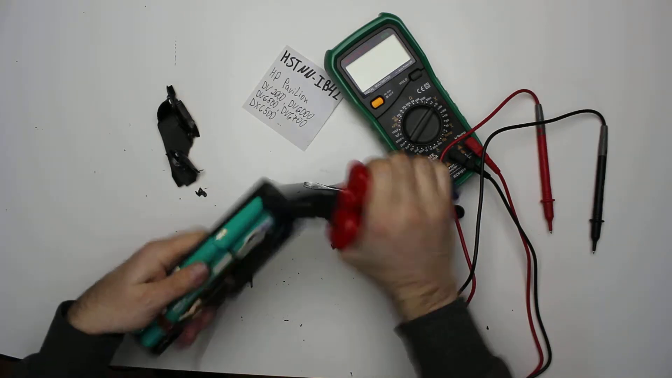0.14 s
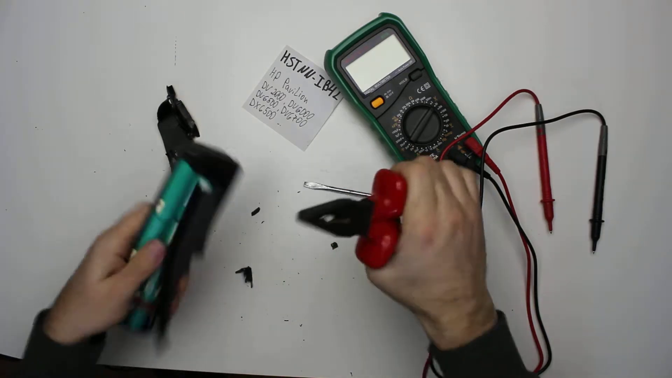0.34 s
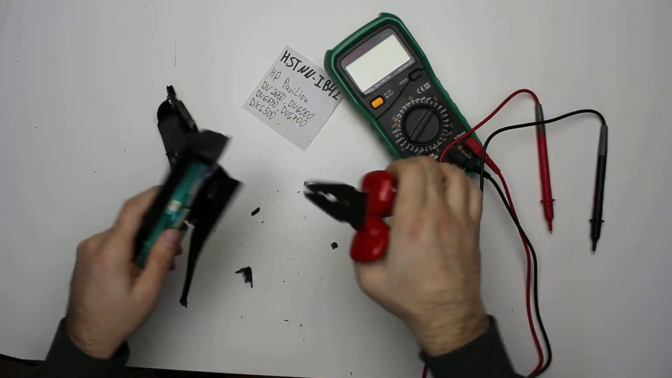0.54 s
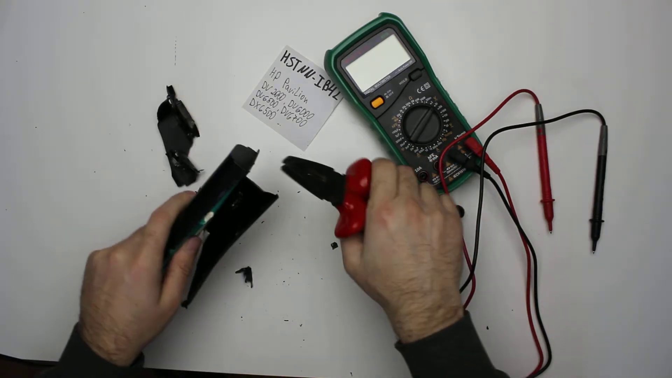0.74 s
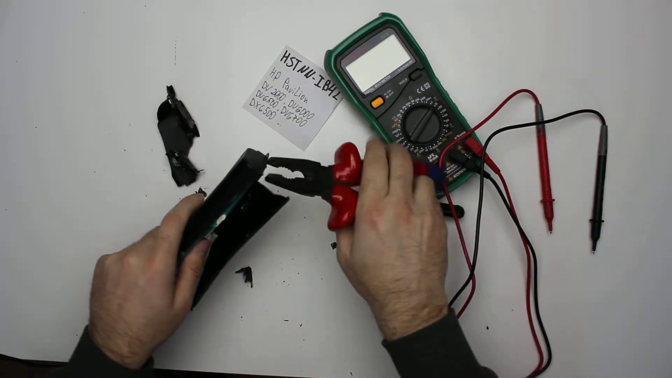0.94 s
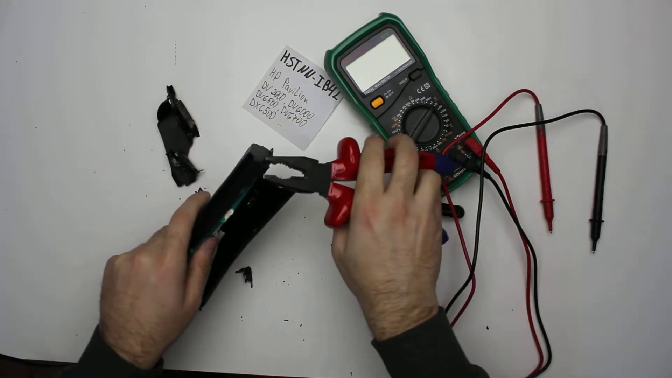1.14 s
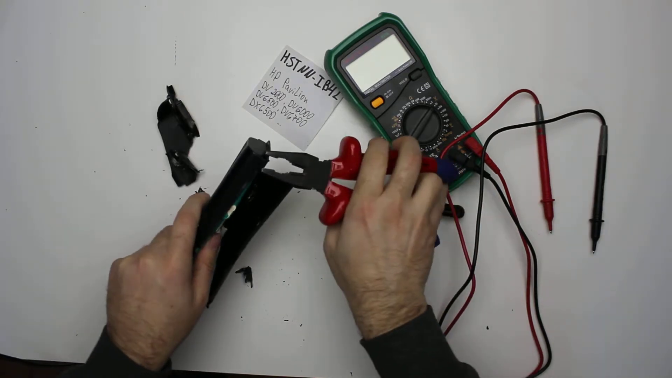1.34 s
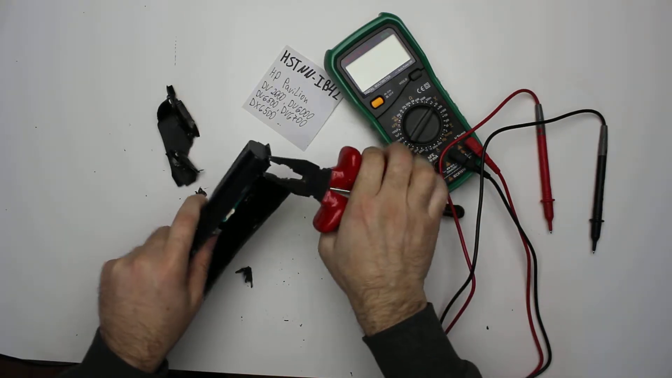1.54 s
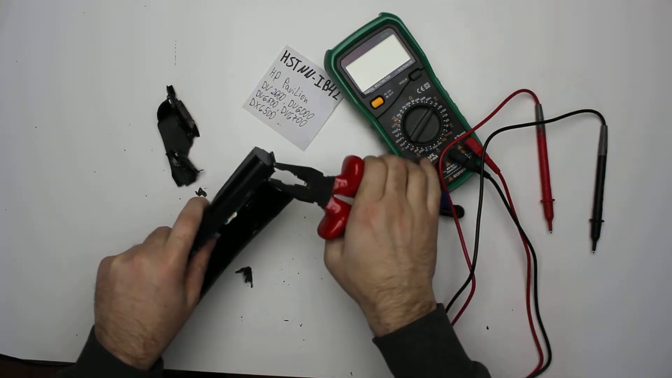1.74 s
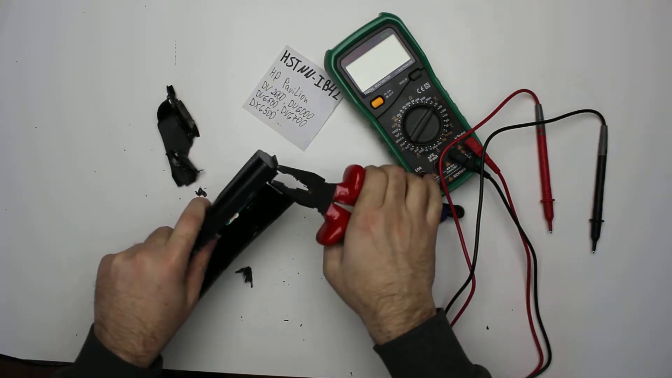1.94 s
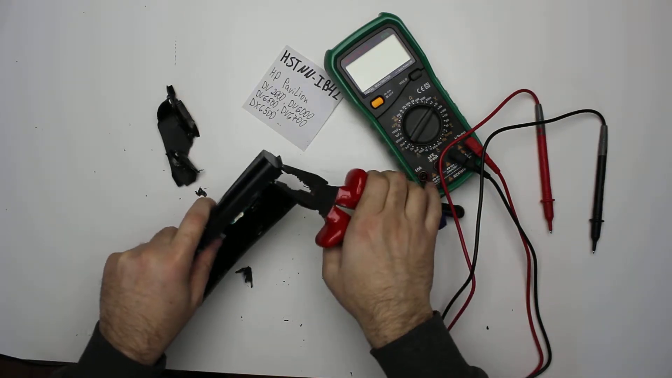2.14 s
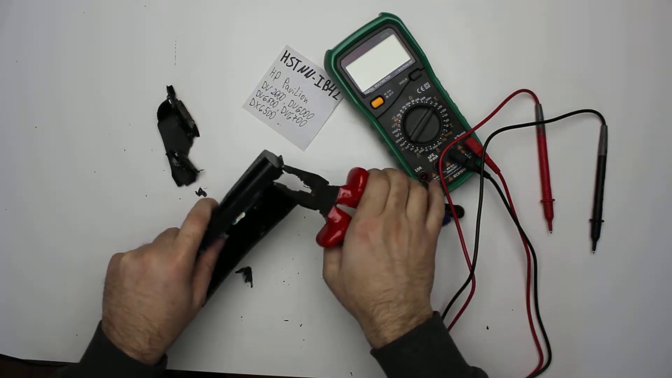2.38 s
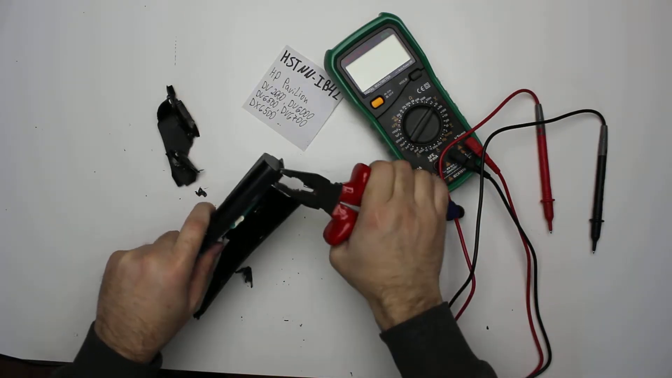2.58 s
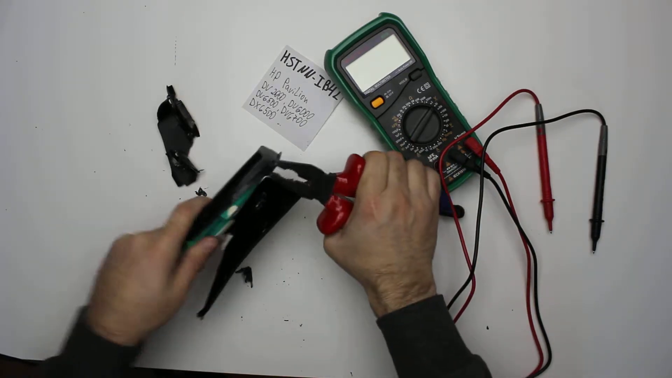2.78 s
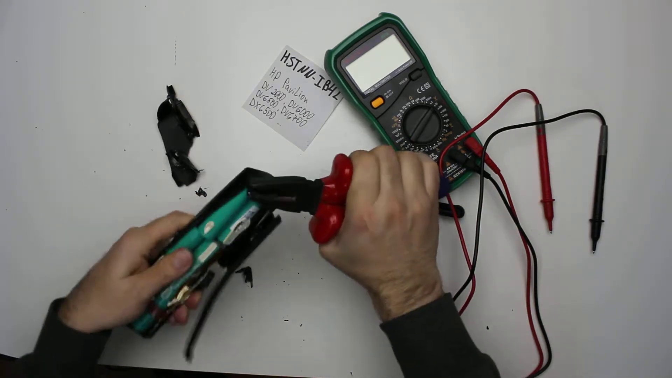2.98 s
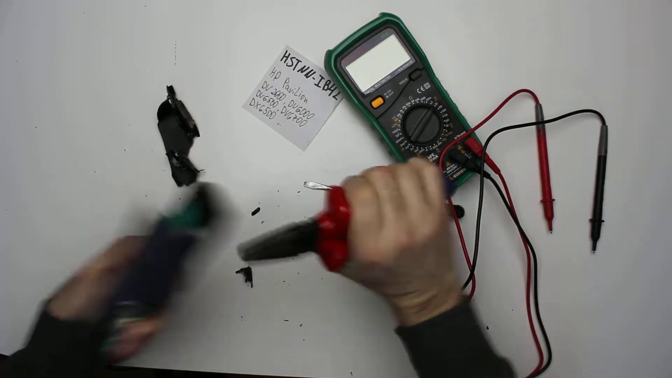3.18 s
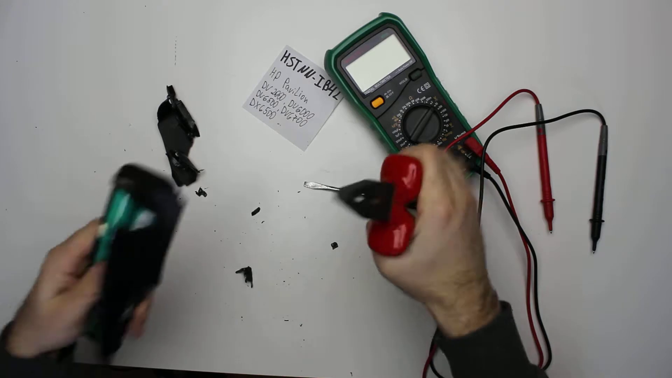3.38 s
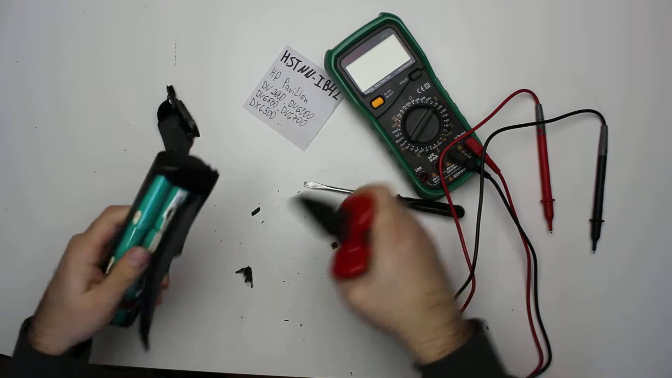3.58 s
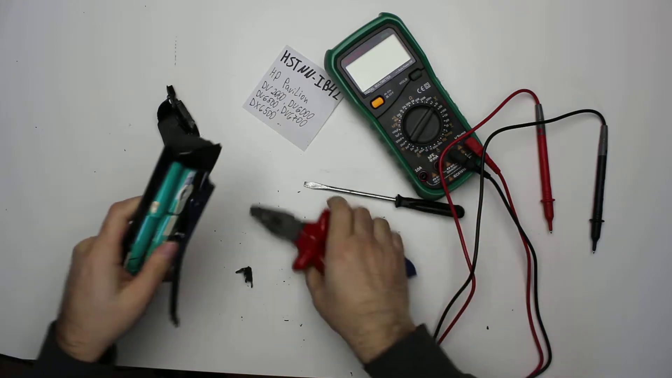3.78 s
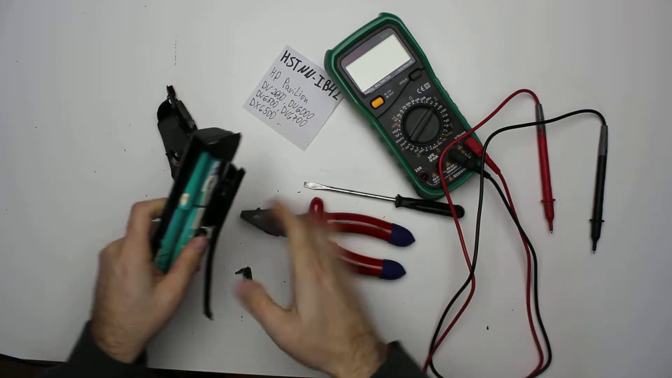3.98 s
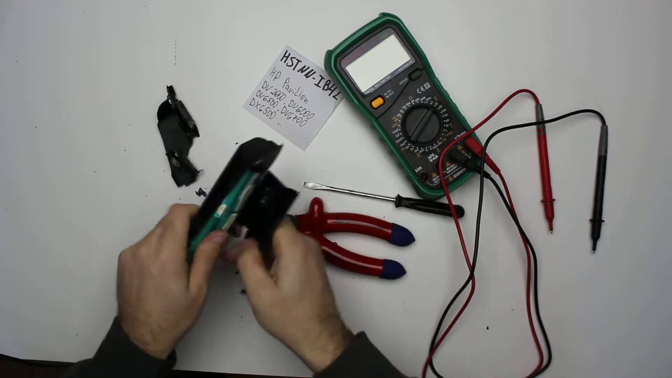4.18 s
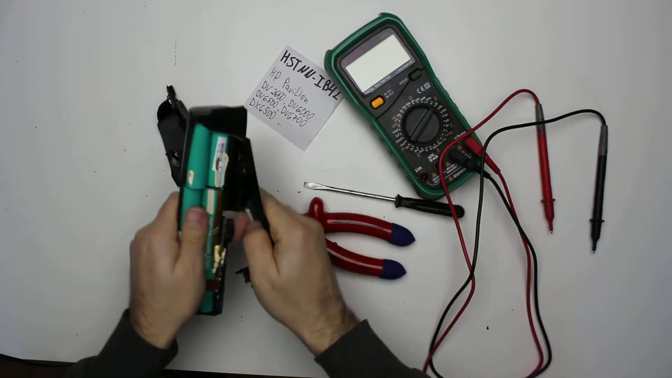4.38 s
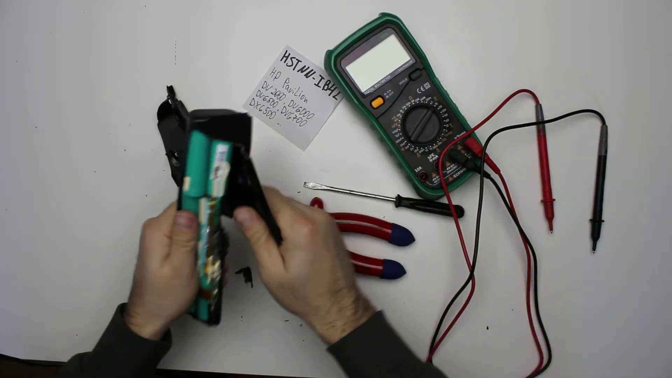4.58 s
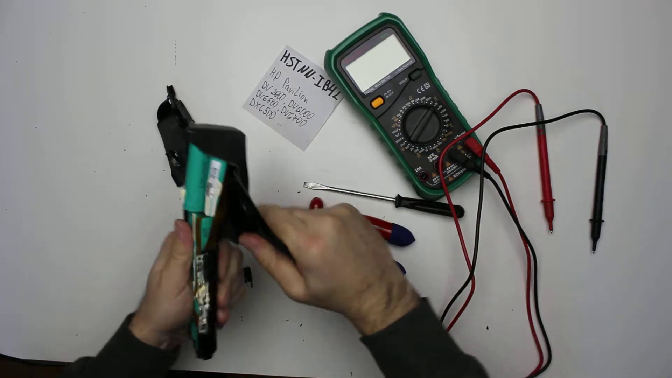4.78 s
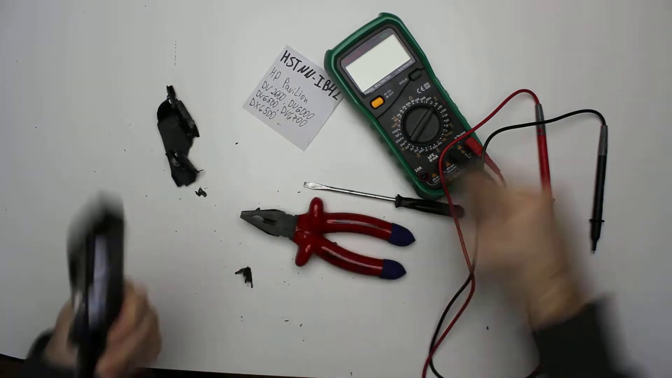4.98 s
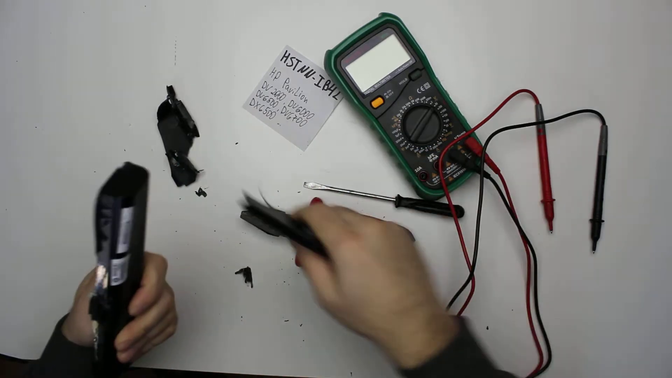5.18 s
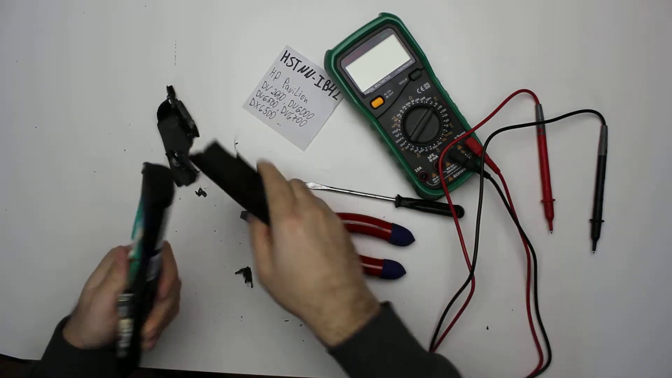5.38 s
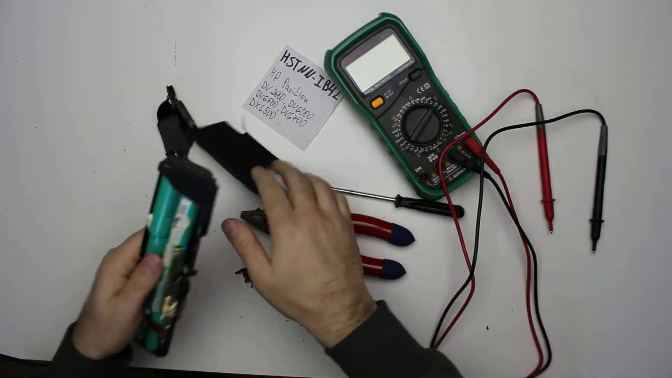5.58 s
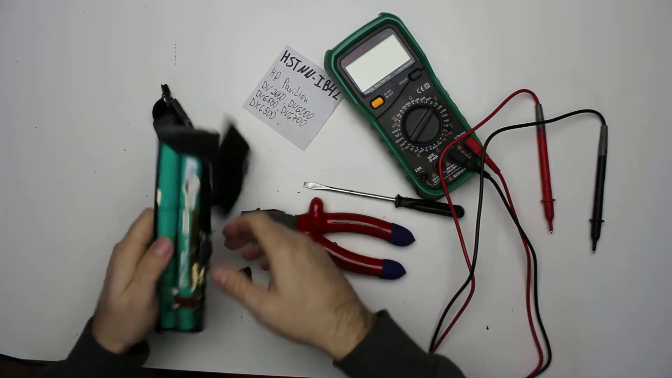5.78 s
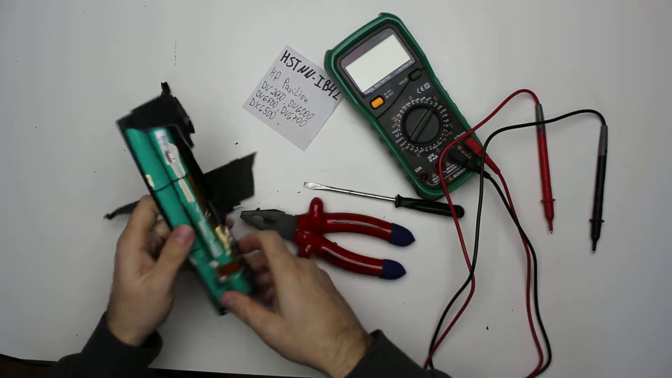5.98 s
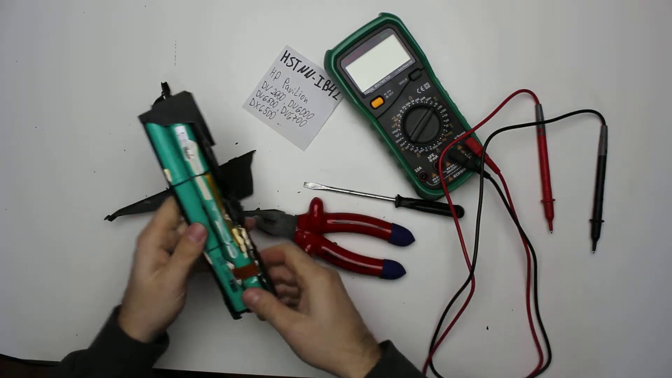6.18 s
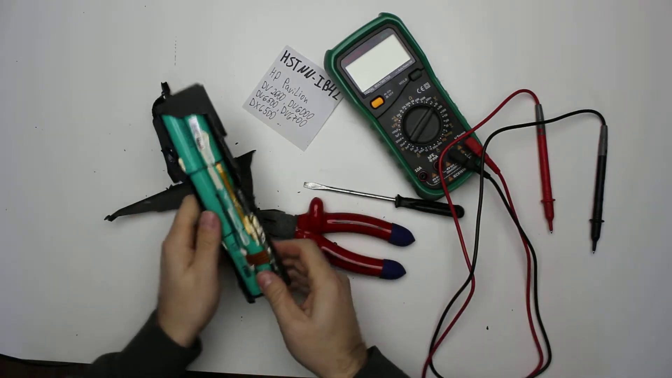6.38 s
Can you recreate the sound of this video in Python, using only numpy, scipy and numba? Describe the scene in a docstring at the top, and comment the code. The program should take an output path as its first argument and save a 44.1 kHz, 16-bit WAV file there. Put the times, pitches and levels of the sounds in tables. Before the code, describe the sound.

A short scrape and a sharp plastic snap open the sound, as pliers pry at a hard battery case. Sparse small ticks follow until about 1.5 seconds, then a pause. From 2.4 seconds, clicks and little creaks gather, with loud cracks at 2.9 and 3.1 seconds. At 3.8 seconds the pliers drop onto a table with a heavy thud and bounce a few times. The plastic crackles, scrapes and ticks from 4.1 seconds, breaking with a loud, bright cluster of snaps at 4.8. After a few faint ticks, the torn-off lid clatters down at 5.5 seconds, and dense knocks and rubbing continue until 6, thinning to light ticks by 6.5. Everything sounds close, in a small room with a short echo, faint hiss and low room noise. The hardest hits distort slightly and briefly duck the volume.

```python
"""In a small room, a hard plastic battery case is pried with pliers over a table. It scrapes, snaps,
ticks and creaks as its cells, wall and breaking edge are set ringing. The pliers drop on the table top
and bounce, and the torn-off lid clatters down after them. Quiet hiss and low room noise lie beneath.
The loudest blows are clipped, and an automatic volume control dips fast and slowly rises again."""
import sys
import numpy as np
from scipy import signal
from scipy.fft import rfft, irfft, next_fast_len
from scipy.io import wavfile
from scipy.ndimage import uniform_filter1d
from numba import njit

SR = 44100
rng = np.random.default_rng(int(sys.argv[2]) if len(sys.argv) > 2 else 0)


def unload_audio(sound):
    """Save the sound as a 16-bit wav file, at the path given as the first command line argument."""
    columns = np.transpose(np.atleast_2d(sound))
    # keep every value between -1 and 1, then stretch to whole-number steps
    steps = np.round(np.clip(columns, -1, 1) * 32767)
    wavfile.write(sys.argv[1], SR, steps.astype(np.int16))


N = 283561


def amp(db):
    """Turns decibels into a multiplier."""
    return 10 ** (np.asarray(db) / 20)


def unit(x):
    """Scales a sound to an average power of 1."""
    return x / np.sqrt(np.mean(x ** 2) + 1e-20)


def along(points, hz):
    """Reads between (pitch_hz, value) points on a log pitch scale."""
    pitches, values = np.transpose(points)
    return np.interp(np.log(hz + 1), np.log(pitches + 1), values)


def filtered(x, response):
    """Multiplies each frequency in x by response(hz)."""
    size = next_fast_len(len(x) + 8192)
    return irfft(rfft(x, size) * response(np.fft.rfftfreq(size, 1 / SR)), size)[:len(x)]


def resonances(modes, hz):
    """How strongly each mode (a pitch an object likes to ring at) answers, one row a mode."""
    return np.array([(-1) ** k * amp(db) * 1j * hz * width / (pitch ** 2 - hz ** 2 + 1j * hz * width)
                     for k, (pitch, width, db) in enumerate(modes)])


def ringing(x, modes):
    """The sound of an object with these modes when x shakes it."""
    return filtered(x, lambda hz: resonances(modes, hz).sum(axis=0))


# How long the room's main echo takes to fade by 60 dB: pitch_hz, fade_s
ROOM_FADES = [(200, 0.16), (600, 0.19), (2500, 0.32), (5000, 0.28), (10000, 0.18), (16000, 0.12)]

def room_tail():
    """A fresh room echo of energy 1, each pitch dying away at its own speed."""
    hz, t, noise = signal.stft(rng.standard_normal(SR * 2 // 3), SR, nperseg=256)
    fall_db = -60 * t / along(ROOM_FADES, hz)[:, None]
    lingering = amp(-21.5 + fall_db / 3.4)
    tail = signal.istft(noise * (amp(fall_db) + lingering), SR, nperseg=256)[1]
    return np.pad(tail / np.linalg.norm(tail), (round(0.0036 * SR), 0))  # delay from the nearest wall


# The tone colour of the room's hiss: pitch_hz, relative_level_db
HISS_COLOUR = [(15, -73), (25, -34.5), (120, -19.5), (150, -12), (195, -10.5), (320, -16), (580, -21.5),
               (720, -19), (1100, -24.5), (2080, -28.5), (5970, -35), (8300, -35.5), (15600, -42.5),
               (16000, -79.5)]

def hiss():
    """Quiet, steady room noise, strongest in the bass."""
    return amp(-52.5) * unit(filtered(rng.standard_normal(N), lambda hz: amp(along(HISS_COLOUR, hz))))


# The random flutter of the low room noise, drawn as a level curve: time_s, level_db
FLUTTER_LEVELS = [(0, -71), (0.421, -51), (0.681, -59.5), (0.959, -49), (1.22, -64.5), (1.6, -60),
                  (1.92, -49.5), (2.14, -57), (2.299, -51.5), (2.539, -62.5), (2.85, -55.5), (3.348, -58),
                  (3.7, -48), (4.2, -59), (4.549, -47), (4.799, -57.5), (6.05, -57.5), (6.269, -47)]

def low_room_noise():
    """A steady, narrow band of room noise near 163 Hz, played as a sine that follows the flutter."""
    level_db = np.interp(np.arange(N) / SR, *np.transpose(FLUTTER_LEVELS))
    pitch_hz = 163.8 + 0.44 * (level_db + 54.5)
    return np.sqrt(2) * amp(level_db) * np.sin(2 * np.pi * np.cumsum(pitch_hz) / SR)


# How the pack of cells, the case wall and the breaking edge ring: pitch_hz, width_hz, relative_level_db
CELL_MODES = [(306, 77, 2.5), (433, 22, 1), (546.3, 49, 0.5), (742, 80, 1), (1027, 118, -2.5),
              (1229, 100, 1.5), (1483, 277, -2.5)]
WALL_MODES = [(1826, 540, -8), (2220, 258, 0), (2532, 140, 1.5), (2970, 455, -3.5), (3778, 610, -5.5),
              (4426, 330, -2), (4752, 285, -1.5), (6570, 1400, -11.5)]
EDGE_MODES = [(5900, 630, -12.5), (9540, 3200, 0), (11440, 850, 4), (14660, 4600, 0), (15980, 1000, 0.5)]
# Strokes of fingers and plier jaws over the case:
# start_s, length_s, start_db, end_db, edge_above_wall_db, cells_above_wall_db
STROKES = [(0, .12, -22.5, -81, -13, -3), (2.441, 0.097, -43, -49, -2, -2), (2.523, 0.33, -53, -61, -5, 7),
           (2.876, 0.0046, -37, -28, -1, -2), (3.074, 0.07, -33, -58, -11, -14),
           (3.776, 0.045, -46, -45.5, -1, 16), (3.95, .125, -59, -52, 5, -3),
           (4.085, 0.029, -32, -31, 2.5, -20), (4.15, 0.076, -25, -64, -1.5, -15),
           (4.282, 0.06, -47.5, -45, 1.5, 1), (4.455, 0.082, -38.5, -43, 0, 1),
           (4.57, .18, -53, -59, 0, -2.5), (5.197, .3, -60.5, -61, 2, 9.5),
           (5.54, .15, -28.5, -37.5, -11, 8), (5.697, 0.082, -19.5, -42, -6, 5.5),
           (5.786, 0.038, -38, -38, 5, 18), (5.864, 0.16, -39.5, -53.5, -4, 18),
           (6.043, 0.2, -63.5, -57, 3.5, 12.5), (6.27, 0.24, -52, -55, 0.5, -2)]

def rubbing():
    """Many tiny slips of uneven size shake the three parts of the case."""
    out = np.zeros(N)
    slips = rng.standard_normal(N) * amp(3 * rng.exponential(size=N))
    table_echo_s, table_echo_db = .00045, -10.5
    slips = filtered(slips, lambda hz: 1 + amp(table_echo_db) * np.exp(-2j * np.pi * hz * table_echo_s))
    wall, edge, cells = (unit(ringing(slips, modes)) for modes in (WALL_MODES, EDGE_MODES, CELL_MODES))
    for start_s, length_s, start_db, end_db, edge_db, cells_db in STROKES:
        blend = wall + amp(edge_db) * edge + amp(cells_db) * cells
        stroke = blend[round(start_s * SR):][:round(length_s * SR)]
        add(out, start_s, stroke * amp(np.linspace(start_db, end_db, len(stroke))))
    return out + amp(-5.5) * signal.fftconvolve(out, room_tail())[:N]


# Snaps, ticks and clatter of the plastic (each part stretches the base fade by its own amount):
# start_s, wall_db, cells_db, edge_db, base_fade_s, wall_pitch_hz, cells_pitch_hz
SNAP_EVENTS = [(.1371, 2, -9, 10.5, 0.033, 4030, 782), (.175, -17, -18.5, -13, 0.017, 4670, 810),
               (.4505, -25, -60, -2, .0056, 2670, 730), (.5027, -41, -54, -32.5, .028, 2760, 540),
               (.5349, -60, -55, -39, 0.033, 4040, 740), (1.0467, -17.5, -29, -21.5, 0.04, 3740, 1250),
               (1.1414, -39, -43, -39.5, 0.015, 2420, 1380), (1.1886, -39.5, -44, -42, .019, 2720, 433),
               (1.3434, -45, -66, -28.5, 0.02, 2780, 830), (1.4678, -30.5, -40.5, -20, 0.014, 4060, 1410),
               (1.4988, -42.5, -40.5, -45, 0.028, 4100, 597), (2.4374, -25, -31.5, -29, 0.029, 4110, 573),
               (2.5154, -16, -27, -20, 0.022, 2350, 1170), (2.5471, -26.5, -35, -36, .013, 2320, 1230),
               (2.5711, -27.5, -53, -16.5, 0.018, 4180, 980),
               (2.6057, -22.5, -31, -26.5, 0.0056, 2180, 1160),
               (2.6332, -40, -39.5, -35.5, 0.017, 2270, 1290), (2.6997, -29, -32.5, -7, 0.018, 2130, 375),
               (2.7056, -11.5, -25.5, -17.5, 0.0036, 5060, 566), (2.7303, -23, -44, -8, 0.009, 5400, 362),
               (2.8131, -19, -37.5, -22.5, 0.0087, 4670, 1390),
               (2.8226, -15, -26, -19.5, 0.003, 1960, 1410),
               (2.8343, -23.5, -33.5, -1.5, 0.0068, 1980, 690), (2.8471, -26, -31, -14, 0.021, 4700, 464),
               (2.8856, 5, -13.5, 12.5, 0.018, 4230, 600), (2.9917, -20, -41, -16, 0.0027, 3950, 766),
               (3.0751, -25, -27.5, -25.5, 0.004, 2010, 750),
               (3.0935, -20.5, -29.5, -15.5, .0046, 1970, 490), (3.1085, -17.5, -23, -21, 0.013, 1980, 710),
               (3.138, 8, -3.5, 16.5, 0.0055, 4100, 577), (3.1479, 0, -4, 7, 0.02, 1850, 1400),
               (3.1875, -31, -50, -5, .0097, 4080, 1400), (3.3273, -30.5, -48, -21, 0.0091, 4780, 1380),
               (3.3488, -33, -38, -16, 0.003, 4870, 1290), (3.3751, -39, -55, -29, 0.005, 4770, 750),
               (3.5161, -20, -51.5, -1, 0.0059, 4180, 562), (3.6534, -51.5, -43.5, -30, 0.012, 1830, 370),
               (3.779, -18.5, -19.5, -56, 0.037, 1990, 360), (3.8227, 1.5, 14, -2.5, .032, 1560, 331),
               (3.8921, -12, -19.5, -16.5, 0.02, 2030, 358), (3.9573, 3, 8, -33.5, 0.008, 1800, 713),
               (4.0871, -42, -33, -34, 0.042, 2210, 640), (4.1311, -24, -42, -29, .018, 4020, 680),
               (4.1494, -17.5, -20, -15, 0.023, 2430, 730), (4.1925, -13.5, -34, -9, 0.01, 4150, 770),
               (4.2724, -30.5, -39, -15, 0.013, 1600, 1395), (4.3432, -18.5, -19, -13, 0.022, 4300, 704),
               (4.3488, -12.5, -38, -18, 0.016, 4250, 720), (4.3618, -28, -41.5, 8, 0.018, 4640, 940),
               (4.3653, -26, -39, 4.5, 0.0031, 4210, 765), (4.3904, -22, -30.5, -1, 0.0055, 4880, 1150),
               (4.4031, -19, -26, -2, 0.0049, 4250, 1460), (4.4249, -19, -38.5, -30.5, 0.0073, 2870, 1320),
               (4.4291, -33.5, -54, -7.5, 0.0057, 3800, 1200),
               (4.4861, -11.5, -29.5, -12.5, 0.0093, 3750, 730),
               (4.5446, -14, -17, -18.5, 0.0054, 2600, 1290), (4.5484, -1, -7, -9, 0.0054, 2570, 694),
               (4.602, -20, -26, -22, .004, 4200, 1390), (4.6343, -19.5, -32, -24.5, 0.0055, 2140, 1130),
               (4.651, -45.5, -48.5, -33, .004, 4790, 1400),
               (4.6656, -15.5, -22.5, -25.5, 0.0083, 1860, 740), (4.688, -40.5, -52, -31, .004, 4800, 1400),
               (4.7046, -18.5, -28, -19.5, 0.012, 1740, 1390), (4.717, -24.5, -51, -25.5, .004, 4820, 1400),
               (4.7589, -6, -19.5, .5, 0.0065, 2400, 695), (4.7861, -23, -24.5, -31.5, 0.012, 1780, 744),
               (4.8183, 10, -1, 22.5, 0.012, 5050, 762), (4.8274, 10, -7.5, 11.5, 0.0075, 2740, 1340),
               (4.8416, 7, -17.5, 15.5, 0.016, 2850, 573), (5.2561, -29, -53, -29, 0.012, 5690, 678),
               (5.3522, -31.5, -59.5, -32.5, 0.011, 4840, 950), (5.3724, -32, -39, -27, 0.027, 2660, 360),
               (5.428, -35, -45, -28, .0062, 4290, 1023), (5.4459, -28.5, -36.5, -27, 0.033, 4190, 395),
               (5.5069, -4, 1, 1, 0.041, 4500, 478), (5.53, 2.5, -5.5, -1.5, 0.022, 1910, 573),
               (5.5519, 9, 2, 0.5, .024, 2210, 1280), (5.5971, -16, -32, -8, 0.042, 2030, 1070),
               (5.6192, -19.5, -18.5, -16, 0.054, 1810, 336), (5.6398, -9.5, -17, -31, 0.024, 4720, 540),
               (5.6592, -13, -28, -16, 0.063, 4900, 505), (5.6818, -20, -28, -12, 0.023, 4870, 474),
               (5.6948, -2, -39, -3, 0.054, 4150, 500), (5.6996, -1, -29, -22, 0.0078, 2460, 550),
               (5.7077, -2, -12, -20, 0.0038, 3600, 1030), (5.7202, 3.5, -1.5, -11, 0.022, 2500, 830),
               (5.786, -2, -16, 0.5, 0.026, 4160, 520), (5.8073, -11.5, -18, -19.5, 0.0084, 2650, 554),
               (5.8302, 5.5, -10, -17, 0.024, 3930, 537), (5.8363, 10.5, -11, 3, 0.02, 2750, 1470),
               (5.862, -8.5, -12, -13.5, 0.031, 3960, 1420), (5.8771, 3, -15.5, -15.5, 0.017, 3890, 537),
               (5.9064, -6.5, -14, -30, 0.12, 2740, 1360), (5.9356, -6.5, -19, -20, 0.025, 4910, 1280),
               (5.9911, -17.5, -22.5, -29.5, 0.041, 2600, 537), (6.1586, -26, -28, -49, 0.026, 3920, 537),
               (6.4254, -19, -52, -8, 0.002, 3090, 830)]

def snaps():
    """Each snap is a sharp crack and a short burst of noise that ring the cells, wall and edge."""
    out, t = np.zeros(N), np.arange(4096) / SR
    hz, sounding = np.fft.rfftfreq(len(t), 1 / SR), t < .08
    tails = [room_tail() for _ in range(16)]
    thump_db, thump_s, scatter_db = -33.5, 0.00077, 2.5
    # modes, reach_octaves, ping_db, fade_stretch, echo_db
    parts = [(CELL_MODES, 0.49, -2.5, 1.73, -6),
             (WALL_MODES, 0.86, 0.5, 2.93, -11.5),
             (EDGE_MODES, 0.94, -11, 1.52, -14)]
    for k, (start_s, wall_db, cells_db, edge_db, fade_s, wall_hz, cells_hz) in enumerate(SNAP_EVENTS):
        # a snap with more edge in it sounds higher
        edge_hz = np.clip(8290 * 2 ** (0.16 * (edge_db - wall_db)), 6100, 14490)
        crack = rng.standard_normal(len(t)) * (1 + 2.57 * np.exp(-t / 0.00029))
        low_thump = t / thump_s * np.exp(1 - t / thump_s)  # heard under the loudest snaps
        add(out, start_s, amp(min(wall_db, edge_db) + thump_db) * low_thump)
        into_room = np.zeros(len(t))
        hits = [(cells_db, cells_hz), (wall_db, wall_hz), (edge_db, edge_hz)]
        for (peak_db, pitch_hz), (modes, reach_octaves, ping_db, stretch, echo_db) in zip(hits, parts):
            responses = resonances(modes, hz)
            # where it breaks decides which modes ring most
            octaves_away = np.log2(np.transpose(modes)[0] / pitch_hz)
            weights = amp(scatter_db * rng.standard_normal(len(modes)))
            weights /= 1 + (octaves_away / reach_octaves) ** 2
            ping = resonances([(pitch_hz, 0.04 * pitch_hz, ping_db)], hz)[0]  # this snap's own note
            burst = crack * amp(-60 * t / (stretch * fade_s))
            ring = irfft(rfft(burst) * (weights @ responses + ping)) * sounding
            ring *= amp(peak_db) / np.abs(ring).max()
            add(out, start_s, ring)
            all_round = irfft(weights ** 0.77 @ responses) * sounding  # from all sides, modes even out
            all_round *= np.linalg.norm(ring) / np.linalg.norm(all_round)
            into_room += amp(echo_db + 0.057 * (peak_db + 12)) * all_round  # louder snaps get more echo
        add(out, start_s, signal.fftconvolve(into_room, tails[k % len(tails)]))
    return out


# Creaks, and narrow rings that linger after snaps:
# start_s, length_s, pitch_hz, width_hz, start_db, end_db
CREAKS_AND_RINGS = [(0.141, 0.18, 4810, 700, -31, -52.5), (2.432, 0.1, 4300, 370, -47, -43.5),
                    (2.888, 0.12, 290, 12, -43.5, -52), (2.89, 0.2, 485, 9.8, -46.5, -57),
                    (3.141, 0.16, 278, 14, -38, -63), (2.88, 0.1, 1260, 60, -23, -52.5),
                    (3.323, 0.04, 4660, 148, -18.5, -51), (4.449, 0.085, 713, 38, -25.5, -40),
                    (4.546, 0.043, 2600, 300, -28, -25), (5.589, 0.097, 5010, 140, -40, -22),
                    (6.159, 0.03, 552, 19, -27, -40.5), (6.283, 0.049, 552, 39, -46.5, -47.5)]

def creaks_and_rings():
    """Noise through one narrow mode, heard as a creak or a lingering ring."""
    out = np.zeros(N)
    for start_s, length_s, pitch_hz, width_hz, start_db, end_db in CREAKS_AND_RINGS:
        noise = rng.standard_normal(SR // 5)[:round(length_s * SR)]
        tone = ringing(noise, [(pitch_hz, width_hz, 0)])
        tone = unit(ringing(tone, [(pitch_hz, 2 * width_hz, 0)]))  # a second pass makes it purer
        loudness = amp(np.linspace(start_db, end_db, len(tone))) * signal.windows.tukey(len(tone), .08)
        add(out, start_s, tone * loudness)
    return out + amp(-19.5) * signal.fftconvolve(out, room_tail())[:N]


# How the table top rings: pitch_hz, width_hz, relative_level_db
TABLE_MODES = [(96, 21, -14), (198, 51, -1), (263, 160, 0), (299.2, 94, 3), (430.5, 130, -7.5),
               (562, 21, 3), (702, 210, -5.5), (1290, 490, -6.5), (2113, 480, -13)]
# The pliers land and bounce: start_s, peak_db, contact_s
PLIER_BOUNCES = [(3.8167, 18.5, 0.0004), (3.852, -1.5, 0.00041), (3.954, 10, 0.00032), (3.998, 0, 0.00066),
                 (4.033, -0.5, 0.00037), (4.063, -17, 0.0003)]

def plier_thuds():
    """Each landing gives the table top a brief push; a longer contact sounds duller."""
    out, t = np.zeros(N), np.arange(SR // 4) / SR
    for start_s, peak_db, contact_s in PLIER_BOUNCES:
        knock = ringing(t * np.exp(-t / contact_s), TABLE_MODES)
        knock *= amp(peak_db) / np.abs(knock).max()
        add(out, start_s, knock)
        add(out, start_s, amp(-1.5) * signal.fftconvolve(knock, room_tail()))
    return out


def add(out, start_s, x):
    """Mixes x into out, beginning at start_s."""
    part = out[round(start_s * SR):][:len(x)]
    part += x[:len(part)]


def scene():
    """All the sounds together in one channel."""
    return (hiss() + low_room_noise() + rubbing() + snaps() + creaks_and_rings() + plier_thuds())[None]


@njit
def volume_control(wanted_db, fall_s, rise_db_per_s):
    """Glides down fast to the wanted volume and climbs back at a steady pace."""
    out, now = np.empty_like(wanted_db), wanted_db[0]
    for i, wanted in enumerate(wanted_db):
        if wanted < now:
            now += (wanted - now) / (fall_s * SR)
        else:
            now = min(wanted, now + rise_db_per_s / SR)
        out[i] = now
    return out


def record(dry):
    """Turns loud moments down, clips the peaks, adds electronic hiss and cuts the highest treble."""
    recent_power = uniform_filter1d(dry[0] ** 2, round(.02 * SR), origin=round(.009 * SR))
    loudness_db = 10 * np.log10(np.abs(recent_power) + 1e-12)
    wanted_db = -.33 * np.maximum(loudness_db + 38, 0)
    x = dry[0] * amp(volume_control(wanted_db, fall_s=.008, rise_db_per_s=13))
    clipped = x / (1 + np.abs(x / .99) ** 12) ** (1 / 12)
    noise = amp(-65) * filtered(rng.standard_normal(N), lambda hz: (hz < 15700) / (1 + hz / 6000))
    return filtered(clipped + noise, lambda hz: 1 / (1 + (hz / 16100) ** 80))[None]


dry = scene()
out = record(dry)
unload_audio(out)
```